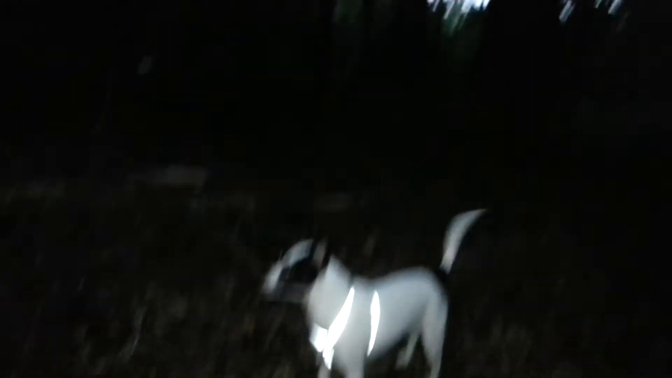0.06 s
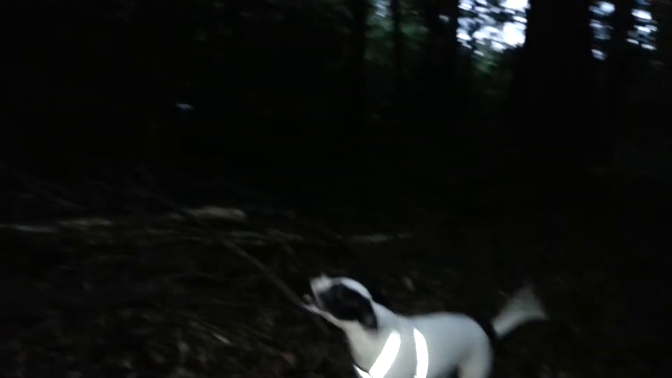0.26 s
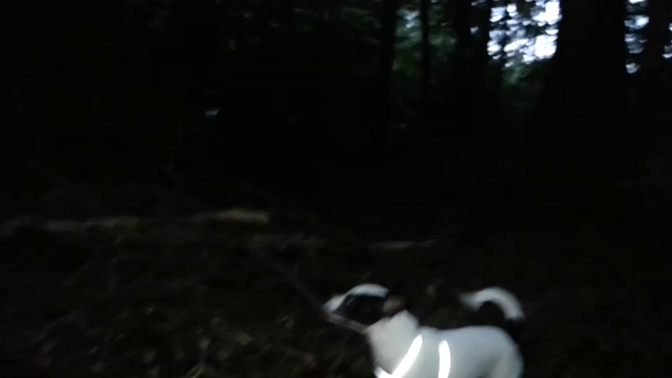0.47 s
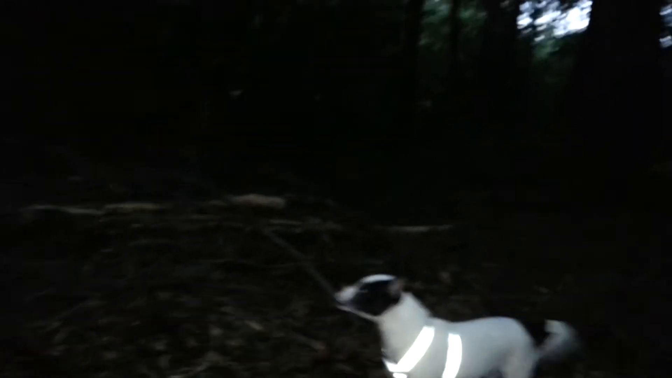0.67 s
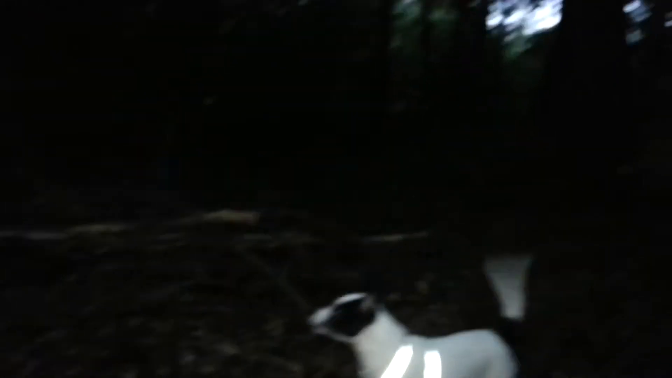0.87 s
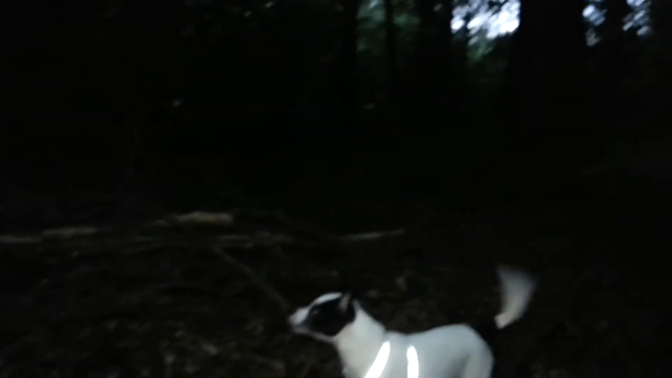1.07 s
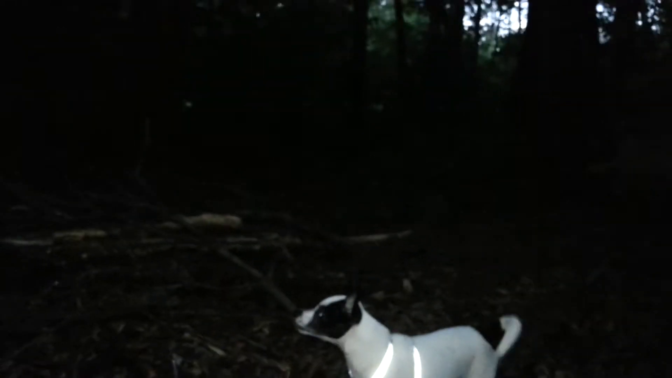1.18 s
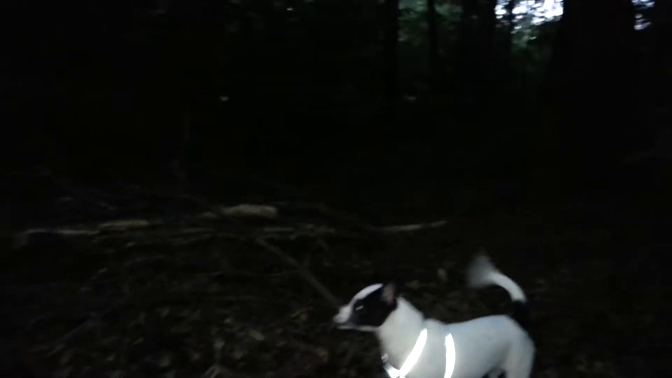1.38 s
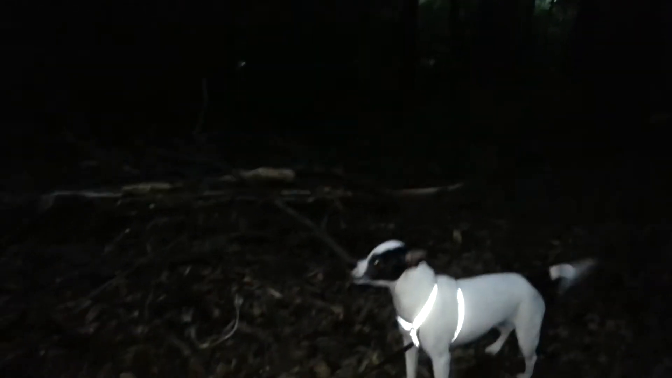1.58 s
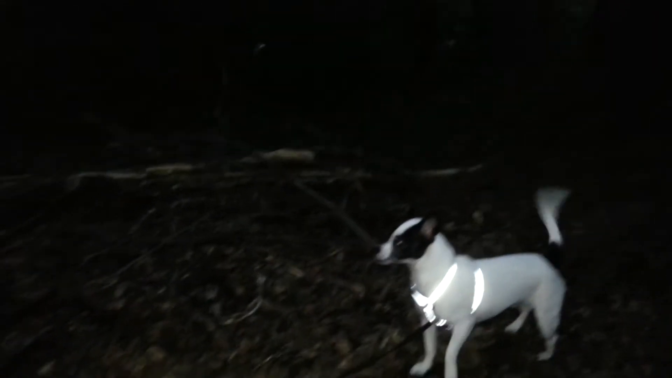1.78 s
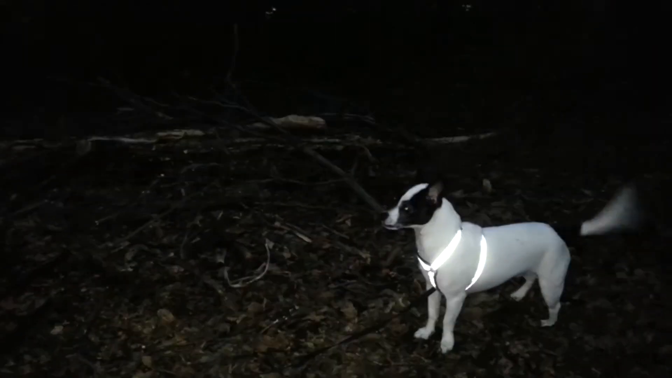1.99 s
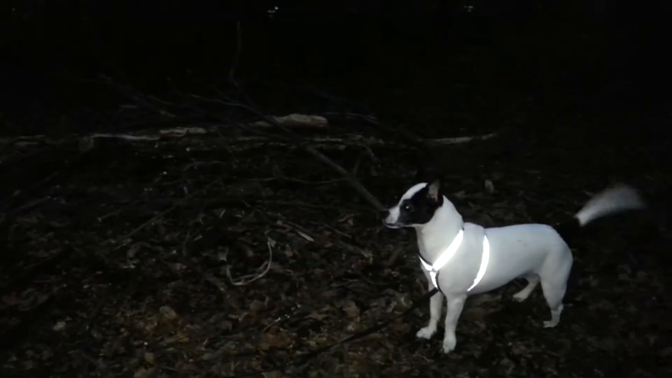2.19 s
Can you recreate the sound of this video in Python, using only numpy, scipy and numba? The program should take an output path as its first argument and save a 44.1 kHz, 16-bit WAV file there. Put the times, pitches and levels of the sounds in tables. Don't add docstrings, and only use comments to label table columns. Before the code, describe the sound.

Single loud bark from a small dog, slightly clipping the close stereo microphones and ringing among trunks, then near quiet with faint insects and twig ticks, a weak breathy huff, creaking growl and thin nasal whine.

```python
import sys
import numpy as np
from scipy import signal
from scipy.fft import rfft, irfft, next_fast_len
from scipy.io import wavfile
from scipy.ndimage import uniform_filter1d, map_coordinates
from numba import njit

SR = 44100
rng = np.random.default_rng(int(sys.argv[2]) if len(sys.argv) > 2 else 0)


def master_out(mix):
    frames = np.transpose(np.atleast_2d(mix))
    ceiling = np.clip(frames, -1, 1)
    pcm = np.round(ceiling * 32767).astype(np.int16)
    wavfile.write(sys.argv[1], SR, pcm)


def volts_from_decibels(level):
    exponent = np.asarray(level, float) / 20
    return 10 ** exponent


N = 97020


def unit(x):
    return x / np.sqrt(np.mean(x ** 2) + 1e-20)


def along(points, hz):
    f, v = np.transpose(points)
    return np.interp(np.log(hz + 1), np.log(f + 1), v)


def wobble(rate, size):
    return map_coordinates(rng.standard_normal(400), [np.arange(size) * rate / SR % 398])


def filtered(x, response):
    m = next_fast_len(N + SR // 2)
    return irfft(rfft(x, m) * response(np.fft.rfftfreq(m, 1 / SR)), m)[..., :N]


def peak(f, hz, width):
    return 1j * f * width / (hz * hz - f * f + 1j * f * width)


def low_pass(f, hz):
    return 1 / (1 - (f / hz) ** 2 + 1j * f / hz)


# f/Hz, level/dB per Hz
AIR_SPECTRUM = [(40, -18), (110, -2.5), (400, -0.5), (1000, -2), (1900, -13.5), (4000, -12.5),
                (12000, -16.5), (14800, -13)]
# f/Hz, correlation
AIR_ALIKE = [(100, .75), (500, .4), (1000, 0.67), (1600, 0.9), (3000, .1)]
# f/Hz, width/Hz, level/dB, pulse rate/Hz
INSECTS = [(2260, 190, -64.5, 13), (2680, 300, -64, 34), (4765, 670, -59, 150)]


def night():
    air_db, swell_db, pulsing_db = -53.5, 1.2, 2

    def shares(f):
        turn = np.arccos(np.clip(along(AIR_ALIKE, f), -1, 1)) / 2
        return volts_from_decibels(along(AIR_SPECTRUM, f)) * [np.cos(turn), np.sin(turn)]

    mid, side = filtered(rng.standard_normal((2, N)), shares)
    air = unit(np.array([mid + side, mid - side]))
    out = volts_from_decibels(air_db + swell_db / 2 * wobble(1.7, N)) * air
    for hz, width, db, rate in INSECTS:
        song = unit(filtered(rng.standard_normal((2, N)), lambda f: peak(f, hz, width) ** 2))
        out = out + song * volts_from_decibels(db + pulsing_db * wobble(rate, N) + swell_db * wobble(1.4, N))
    return out


# first t/s, last t/s, creaks, level/dB
GROWL = [(0, .0071, 2, -37), (.0265, .0415, 3, -32), (.072, .0792, 2, -33), (.108, .1153, 2, -34),
         (1.6833, 1.698, 2, -43), (1.7128, 1.7328, 2, -42), (1.755, 1.7779, 3, -42),
         (1.7927, 1.8217, 3, -41), (1.8335, 1.8756, 5, -37), (1.9053, 1.9237, 3, -37),
         (1.9466, 1.9642, 3, -36), (1.9983, 2.0081, 2, -37), (2.0205, 2.0385, 3, -38),
         (2.078, 2.078, 1, -33), (2.105, 2.1568, 7, -35), (2.1675, 2.1787, 2, -38),
         (2.1852, 2.1935, 2, -38)]
# f/Hz, width/Hz, level/dB
GROWL_TRACT = [(410, 150, 0), (850, 130, 2)]


def growl():
    lead_s, creak_db, shut_lips_hz = .001, -6.5, 1050
    slaps = np.zeros(N)
    for first, last, count, db in GROWL:
        count = int(count)
        at = np.maximum(np.linspace(first, last, count) - lead_s, 0)
        uneven_db = 0.63 * rng.standard_normal(count)
        slaps[np.round(at * SR).astype(int)] = -volts_from_decibels(db + creak_db + uneven_db)

    def tract(f):
        throat = sum(volts_from_decibels(db) * peak(f, hz, width) for hz, width, db in GROWL_TRACT)
        return throat * low_pass(f, shut_lips_hz) ** 3

    return volts_from_decibels(37) * filtered(slaps, tract)


# t/s, peak level/dB, brightest f/Hz
TWIGS = [(.0498, -36.5, 10000), (0.5273, -27.5, 11000), (0.5601, -38, 9000), (0.6136, -45.5, 9000),
         (.7692, -35.5, 9500), (.8026, -43, 8000), (1.064, -47.5, 6500), (1.2789, -43, 2600),
         (1.5234, -36, 4480), (1.7727, -18.5, 5374), (1.8166, -30, 8000), (1.8239, -29, 5002),
         (1.929, -29, 5560), (2.1014, -33, 6000), (2.1332, -35, 8000)]


def twigs():
    tick_t60_s, rattle_t60_s, rattle_db = .004, .03, -15
    level_db, left_db, left_lag = 5, -4, 16
    size = 500
    t, f = np.arange(size) / SR, np.fft.rfftfreq(2 * size, 1 / SR)
    decay = volts_from_decibels(-60 * t / tick_t60_s) + volts_from_decibels(rattle_db - 60 * t / rattle_t60_s)
    out = np.zeros((2, N + SR))
    for s, db, hz in TWIGS:
        burst = rng.standard_normal((2, size)) * decay
        wood = peak(f, hz, 1.1 * hz) * peak(f, 7000, 24000)
        tick = irfft(rfft(burst, 2 * size) * wood)[:, :size]
        tick *= volts_from_decibels(db + level_db) / np.abs(tick).max(1, keepdims=True)
        start = round(s * SR)
        out[0, start + left_lag:][:size] += volts_from_decibels(left_db) * tick[0]
        out[1, start:][:size] += tick[1]
    return out[:, :N]


@njit
def resonate(x, a1, r):
    y = np.zeros(len(x))
    for i in range(2, len(x)):
        y[i] = (1 - r * r) / 2 * (x[i] - x[i - 2]) + a1[i] * y[i - 1] - r * r * y[i - 2]
    return y


def voice(rows, tract, hum):
    jitter, shimmer_db, shimmer_hz = .08, 3.5, 100
    skirt_db = -20.5
    effort, hiss_from_hz = 1.3, 3000
    onset_s = 0.0044
    s, *cols = np.transpose(rows)
    t = np.arange(s[0], s[-1], 1 / SR)
    hz, db, rough, mouth = [np.interp(t, s, c) for c in cols]
    rough = np.clip(rough, 0, 1)

    phase = 2 * np.pi * np.cumsum(hz * (1 + jitter * rough * wobble(220, len(t)))) / SR
    pulses = unit(sum(np.cos(k * phase) for k in range(1, 25)))
    puffs = unit(rng.standard_normal(len(t)) * (0.43 + np.cos(phase)))
    puffs = puffs * np.sqrt(SR / 2 / (24 * hz))
    source = np.sqrt(1 - rough) * pulses + np.sqrt(rough) * puffs

    out = 0
    for k, (shut_hz, open_hz, width, gain_db) in enumerate(tract):
        r = np.exp(-np.pi * width / SR)
        a1 = 2 * r * np.cos(2 * np.pi * (shut_hz + (open_hz - shut_hz) * mouth) / SR)
        once = resonate(source, a1, r)
        ring = resonate(once, a1, r) + volts_from_decibels(skirt_db) * once
        strain_db = (shut_hz > hiss_from_hz) * effort * (db - db.max())
        out = out + (-1) ** k * volts_from_decibels(gain_db + strain_db) * ring
    out = out / np.sqrt(np.abs(uniform_filter1d(out ** 2, size=1500)) + 1e-9)

    onset = np.minimum((t - s[0]) / onset_s, 1)
    cry = out * onset * volts_from_decibels(db + shimmer_db * rough * wobble(shimmer_hz, len(t)))
    hum_db = np.interp(t, *np.transpose(hum), left=-120)
    chest = volts_from_decibels(hum_db + shimmer_db * rough * wobble(shimmer_hz, len(t)))
    x = np.zeros(N)
    x[round(s[0] * SR):][:len(t)] = cry + chest * (np.cos(phase) + 0.19 * np.cos(2 * phase))
    return x


# t/s, pitch f/Hz, level/dB, roughness 0-1, mouth opening 0-1
BARK = [
    (.198, 300, -13, 0.2, 0),
    (.221, 344.2, -0.5, 0.08, 0.06),
    (.241, 372.4, 0, 0.17, 0.56),
    (.257, 478.1, 0, 0.44, 0.87),
    (.303, 440.7, -2.5, 0.46, .75),
    (.358, 400, -11, 0.7, 0.47),
    (.367, 329.2, -26.5, 0.25, 0.73),
    (.39, 238.7, -21, 0.5, 0.6),
    (.435, 187, -37.5, 0.3, 0.37),
]
# f/Hz closed, f/Hz open, width/Hz, level/dB
BARK_TRACT = [(300, 120, 200, -27), (698, 991, 260, 2), (1562, 1493, 246, -1.5), (1963, 2300, 270, -8.5),
              (4044, 3300, 2600, -31), (7500, 7500, 12000, -41)]
# t/s, level/dB
BARK_HUM = [(.335, -58), (.355, -38), (.40, -36), (.435, -58)]


def bark():
    return voice(BARK, BARK_TRACT, BARK_HUM)


# t/s, pitch f/Hz, level/dB, roughness 0-1, mouth opening 0-1
HUFF = [
    (1.554, 228.8, -23.5, 0.422, .1),
    (1.570, 215.2, -18, 0.624, 0.078),
    (1.586, 205.2, -17, 0.36, 0.17),
    (1.596, 223.1, -16.5, 0.92, .3),
    (1.601, 234, -5.5, 0.4, 0.48),
    (1.607, 238.9, -19.5, 0.81, .5),
    (1.636, 223.1, -26, 0.66, .9),
    (1.67, 216, -49.5, 0.97, 1),
    (1.71, 170, -54, .6, 0.59),
]
# f/Hz closed, f/Hz open, width/Hz, level/dB
HUFF_TRACT = [(224, 200, 200, -19.5), (670, 704, 246, 6), (1242, 1487, 276, -0.5), (1687, 2300, 203, -5.5),
              (4150, 10000, 1100, -52)]
# t/s, level/dB
HUFF_HUM = [(1.56, -42), (1.62, -41), (1.67, -44), (1.71, -60)]


def huff():
    return filtered(voice(HUFF, HUFF_TRACT, HUFF_HUM), lambda f: low_pass(f, 2240))


def nose():
    start_s, length_s, level_db = 1.56, .17, -47.5
    u = np.clip((np.arange(N) / SR - start_s) / length_s, 0, 1)
    puff = np.sin(np.pi * u ** 0.61) ** 2 * volts_from_decibels(2.5 * wobble(80, N))
    hiss = unit(filtered(rng.standard_normal(N), lambda f: peak(f, 7000, 6500) ** 3))
    return volts_from_decibels(level_db) * puff * hiss


# t/s, pitch f/Hz, level/dB
WHINE = [(2.009, 570, -93), (2.049, 590, -53.5), (2.077, 600, -65), (2.11, 634, -52.5), (2.142, 600, -54.5),
         (2.16, 610, -71), (2.187, 600, -78), (2.2, 600, -57)]
# multiple of the pitch, level/dB
WHINE_PARTS = [(2, 1), (3, 3.5), (4, -11)]


def whine():
    s, hz, db = np.transpose(WHINE)
    t = np.arange(N) / SR
    phase = 2 * np.pi * np.cumsum(np.interp(t, s, hz) * (1 + 0.015 * wobble(70, N))) / SR
    level_db = np.interp(t, s, db, left=-120)
    return sum(volts_from_decibels(level_db + part_db + 3.5 * wobble(49, N)) * np.sin(k * phase)
               for k, part_db in WHINE_PARTS)


# f/Hz, t60/s
WOODS = [(300, 0.98), (600, 0.81), (1100, 1.275), (2300, 1.21), (5000, 1.6), (12000, 0.8)]
# f/Hz, level/dB
NEAR_BRIGHT = [(500, -2), (1500, 2), (4000, 4), (10000, 8.5)]


def woods(x):
    far_db, near_db, near_t60_s, far_rise_s = -22, -8.5, 0.17, 0.044
    hz, t, z = signal.stft(rng.standard_normal((2, 2, 3 * SR // 2)), SR, nperseg=256)
    far = volts_from_decibels(-60 * t / along(WOODS, hz)[:, None]) * np.minimum(t / far_rise_s, 1)
    near = volts_from_decibels(along(NEAR_BRIGHT, hz)[:, None] - 60 * t / near_t60_s)
    tails = signal.istft(z * np.array([far, near])[:, None], SR, nperseg=256)[1]
    tail = sum(volts_from_decibels(db) * pair / np.linalg.norm(pair[0]) for db, pair in zip([far_db, near_db], tails))
    smeared = x * (.4 + 1.33 * wobble(260, N))
    delayed = np.pad(smeared, (300, 0))
    return signal.fftconvolve(delayed[None], tail, axes=1)[:, :N]


# f/Hz, left over right level/dB
LEFT = [(100, 0), (400, 1.5), (800, -.5), (1500, 7.5), (5000, 4), (12000, 6)]


def scene():
    loud, muffled = bark(), huff()
    small = nose() + growl() + whine()
    close = filtered(loud + muffled + small, lambda f: volts_from_decibels(np.outer([.5, -.5], along(LEFT, f))))
    to_trees = loud + volts_from_decibels(-9) * muffled + small
    return close + woods(to_trees) + twigs() + night()


def band_limit(x):
    return signal.sosfilt(signal.butter(12, 14500, fs=SR, output="sos"), x)


def record(dry):
    low_hz, skew, clip_top, clip_hard = 45, .04, 1.15, 2.8
    x = filtered(dry, lambda f: (1j * f / (low_hz + 1j * f)) ** 2)
    x = x + skew * x ** 2
    x = x / (1 + np.abs(x / clip_top) ** clip_hard) ** (1 / clip_hard)
    return band_limit(x)


dry = scene()
out = record(dry)
master_out(out)
```